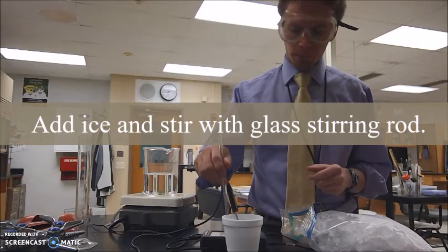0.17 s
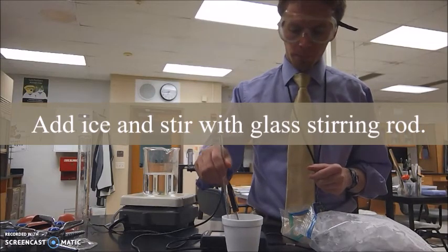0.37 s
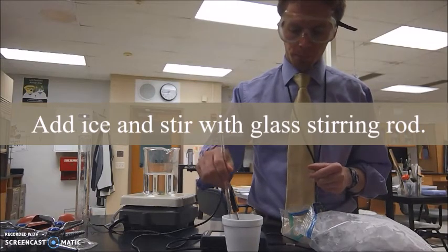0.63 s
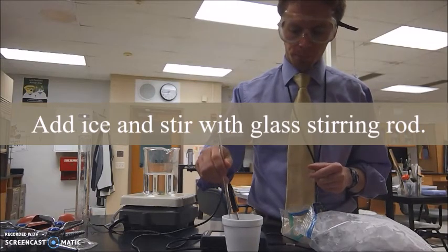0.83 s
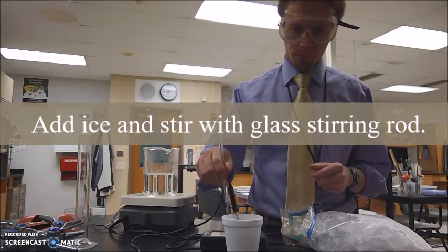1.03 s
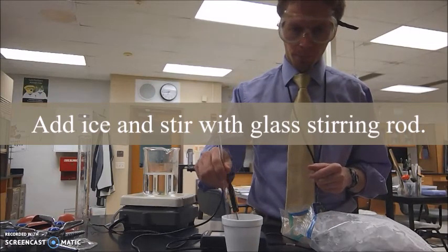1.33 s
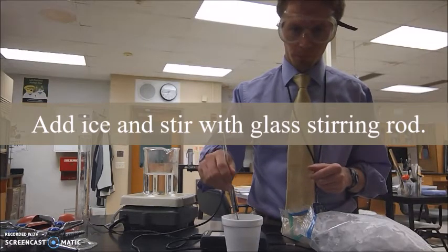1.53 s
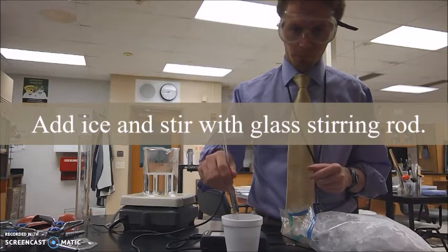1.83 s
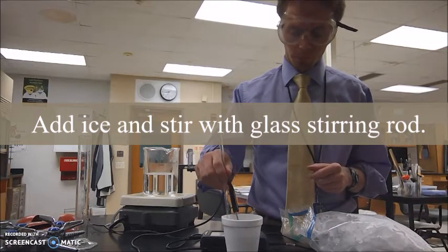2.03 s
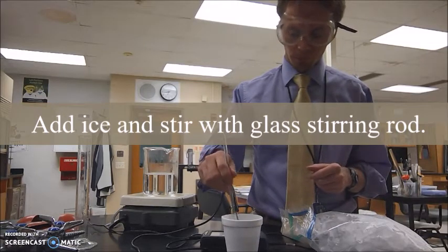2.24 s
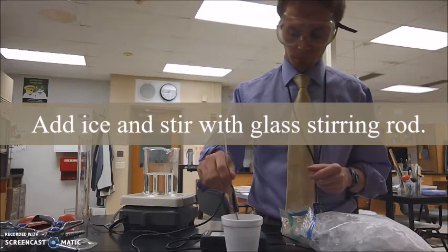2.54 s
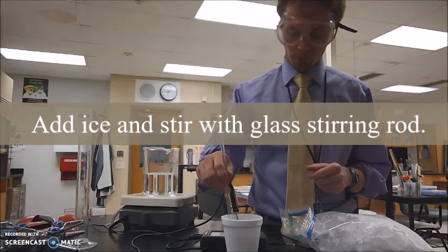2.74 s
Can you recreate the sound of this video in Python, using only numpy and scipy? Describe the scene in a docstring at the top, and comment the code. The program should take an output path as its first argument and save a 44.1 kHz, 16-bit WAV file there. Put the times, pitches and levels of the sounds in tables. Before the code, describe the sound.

Ice cubes clink and knock quickly against a glass stirring rod and foam cup in a lab

```python
"""From start to end, ventilation rumbles very low, the mains hums and a faint high tone stays on in a hard-walled lab.
From the first moment a glass rod stirs ice in a foam cup of water, a metre from a small microphone: modes of the
rod ring over grainy cracks, and cubes knock on the foam wall, which answers dull and hollow as modes over damped noise.
After each knock small cubes tick on and the room echoes; a suppressor ducks the quiet gaps.
At 0.52 s a cube slides along the rod, at 0.64 s comes the strongest clink; near the end two low hollow notes sound."""
import sys
import numpy as np
from scipy import signal
from scipy.io import wavfile
from scipy.ndimage import uniform_filter1d

SR = 44100
rng = np.random.default_rng(int(sys.argv[2]) if len(sys.argv) > 2 else 0)


def level_to_linear(level):
    """Convert decibel levels to linear amplitude factors, elementwise."""
    exponent = np.asarray(level, float) / 20
    return 10 ** exponent


def wav_record(signal):
    """Record a signal, one row per channel, as 16-bit PCM in the file named by sys.argv[1]."""
    frames = np.transpose(np.atleast_2d(signal))
    bounded = np.clip(frames, -1, 1)
    # unit amplitude maps onto the largest positive 16-bit level
    quanta = np.round(bounded * 32767).astype(np.int16)
    wavfile.write(sys.argv[1], SR, quanta)


N = 127890   # length in samples, 2.9 s

RISE_MS, KNOCK_RISE_MS = 0.1, 0.83   # how fast an icy click and a wall knock swell
LEAD_MS = 2.3   # a graze comes this far ahead of each blow
SCATTER_DB = 2.5   # chance differences in how strongly a blow excites each mode
ROD_SHIFT, CUP_SHIFT = 0.004, 0.02   # share by which grip, water and ice move the modes from blow to blow


def rms_one(x):
    """Scale to rms 1."""
    return x / np.sqrt(np.mean(x ** 2) + 1e-20)


def at_hz(points, hz):
    """Read a spectrum table on a log frequency axis."""
    table_hz, value = np.array(points).T
    return np.interp(np.log(hz), np.log(table_hz), value)


def bands(low_hz, high_hz, count, size):
    """Noises in neighbouring bands, each cut from one of two white noises, with their centres in Hz."""
    edges = np.geomspace(low_hz, high_hz, count + 1)
    settle = 8000   # samples dropped while the filters start up
    white = rng.standard_normal((2, size + settle))
    result = []
    for k, (low, high) in enumerate(zip(edges, edges[1:])):
        band = signal.butter(2, [low, high], "band", fs=SR, output="sos")
        result.append((np.sqrt(low * high), signal.sosfilt(band, white[k % 2])[settle:]))
    return result


def train(s, gains):
    """Impulses at the given times."""
    out = np.full(N, 1e-18, dtype=gains.dtype)
    np.add.at(out, (s * SR).astype(int), gains)
    return out


def dying(clicks, t60, rise_ms):
    """Envelope with a short rise and an exponential fall of 60 dB in t60 seconds."""
    fall = level_to_linear(-60 / (t60 * SR))
    rise = np.exp(-1000 / (rise_ms * SR))
    return signal.lfilter([1 - rise], np.convolve([1, -fall], [1, -rise]), clicks)


def ring(clicks, hz, t60, rise_ms):
    """Each click swells briefly into a dying sine; hz may change in time."""
    phase = 2 * np.pi * np.cumsum(hz * np.ones(N)) / SR
    return (dying(clicks, t60, rise_ms) * np.exp(1j * phase)).real


def shifting(s, share):
    """Pitch factor that takes a new value at every blow."""
    steps = 1 + share * rng.standard_normal(len(s) + 1)
    return steps[np.searchsorted(s - LEAD_MS / 1000, np.arange(N) / SR)]


def contacts(s, db, ms):
    """Each blow is a graze, four quick touches and eight rattling ones; complex sizes carry phase slips."""
    lead_db, rattle_per_s, rattle_db, rattle_t60_s = -22, 190, -18, 0.1   # cubes jostle on after a blow
    u = rng.random((len(s), 13))
    slip = rng.normal(0, 0.85, (len(s), 13))
    touch_s = np.sort(u[:, :5], axis=1) * ms / 1000
    touch_s -= touch_s[:, 1:2]
    touch_s[:, 0] = -LEAD_MS / 1000
    rattle_s = ms / 1000 + np.cumsum(-np.log(u[:, 5:] + 1e-6), axis=1) / rattle_per_s
    touch_size = np.tile([level_to_linear(lead_db), 0.33, 0.36, 0.33, 0.25], (len(s), 1))
    rattle_size = level_to_linear(rattle_db - 60 * rattle_s / rattle_t60_s + 5.0 * slip[:, 5:])
    sizes = np.hstack([touch_size, rattle_size])
    slip[:, 5:] *= 4   # the rattle slips further in phase
    when = np.minimum(s[:, None] + np.hstack([touch_s, rattle_s]), (N - 1) / SR)
    return when, level_to_linear(db)[:, None] * sizes * np.exp(1j * slip)


# The colour of the soft air noise. Each row: pitch in Hz, relative level per Hz in dB.
AIR_COLOUR = [(35, 4), (100, -4.5), (300, -10), (750, -19.5), (1300, -27), (2200, -31.5), (4000, -38),
              (10000, -42), (16000, -61)]
# The steady narrow tones. Each row: pitch in Hz, width in Hz, steadiness (no unit), level in dB.
STEADY_TONES = [(26.5, 5, 2.6, -44), (117.8, 14, 1, -55.5), (10650, 25, 0.7, -79)]


def background():
    """Soft air noise in coloured bands, and narrow tones that waver as filtered noise turns their phase and size."""
    air = sum(level_to_linear(at_hz(AIR_COLOUR, hz)) * noise for hz, noise in bands(30.4, 13000, count=20, size=N))
    out = level_to_linear(-51) * rms_one(air)
    t = np.arange(N + SR) / SR   # the first second lets the wavering settle and is dropped
    for hz, width, steady, level_db in STEADY_TONES:
        r = np.exp(-np.pi * width / SR)
        wander = signal.lfilter([1], [1, -2 * r, r * r], rng.standard_normal((2, N + SR)))
        wander = steady + (wander[0] + 1j * wander[1]) / wander.std()
        tone = (wander * np.exp(2j * np.pi * hz * t)).real[SR:]
        out = out + level_to_linear(level_db) * rms_one(tone)
    return out


# How long the lab echoes. Each row: pitch in Hz, time to fall by 60 dB in seconds.
ECHO_TIMES = [(300, 0.4), (1000, 0.36), (3000, 0.25), (8000, 0.21), (16000, 0.11)]


def lab(x):
    """Diffuse reflections from hard walls: noise that swells within 3.1 ms and dies band by band."""
    t = np.arange(SR * 3 // 4) / SR
    noises = bands(193, 22000, count=10, size=len(t))
    tail = sum(noise * level_to_linear(-60 * t / at_hz(ECHO_TIMES, hz)) for hz, noise in noises)
    tail = tail * np.clip(t / 0.0031, 0, 1) ** 2
    return signal.fftconvolve(x, tail / np.sqrt(np.sum(tail ** 2)))[:N]


# A cube slides along the rod. Each row: start in seconds, length in seconds, level in dB.
CUBE_SLIDES = [(0.52, 0.045, -37)]


def jostle():
    """Cubes tick against each other after every knock and while sliding: random grains of short icy pitch."""
    jostle_db, jostle_t60_s = -28.5, 0.24   # level is relative to the knock
    grains_per_s, grain_cycles = 1500, 60.0   # a grain falls by 60 dB in this many cycles
    s, db = np.transpose(CUP_KNOCKS)[:2]
    t = np.arange(N) / SR
    stir = dying(train(s, level_to_linear(db + jostle_db)), jostle_t60_s, rise_ms=4.0)
    for start, length, slide_db in CUBE_SLIDES:
        stir = stir + level_to_linear(slide_db) * np.sin(np.pi * np.clip((t - start) / length, 0, 1) ** 0.71)
    hits = rng.random(N) < grains_per_s / SR
    sizes = level_to_linear(2.65 * np.minimum(rng.exponential(1, N), 4))
    grains = hits * sizes * np.exp(2j * np.pi * rng.random(N))
    pitches = np.geomspace(1300, 13000, 24)
    dealt = rng.integers(0, len(pitches), N)   # which pitch each grain gets
    out = 0
    for k, hz in enumerate(pitches):
        clicks = stir * grains * (dealt == k) * (2300 / hz) ** 0.77 + 1e-18
        out = out + ring(clicks, hz, grain_cycles / hz, RISE_MS)
    return out


# Low hollow notes, perhaps air pockets between the cubes.
# Each row: start in seconds, pitch in Hz, level in dB, time to fall by 60 dB in seconds.
POCKET_NOTES = [(2.661, 455, -34, 0.07), (2.871, 465, -40, 0.1)]


def glugs():
    """Each low hollow note is one softly starting, dying sine."""
    return sum(ring(train(np.array([s]), level_to_linear(np.array([db]))), hz, t60, rise_ms=7.2)
               for s, hz, db, t60 in POCKET_NOTES)


def hollow(s, hollow_db, phase):
    """The air above the water sounds one hollow note, and the bench under the cup booms with it as low noise."""
    note = ring(train(s, level_to_linear(hollow_db) * np.exp(1j * phase)), 558.5 * shifting(s, ROD_SHIFT), 0.2, rise_ms=6.2)
    (_, low), = bands(150, 390, count=1, size=N)
    boom = rms_one(low) * dying(train(s, level_to_linear(-13.5 + hollow_db)), 0.24, rise_ms=7.1)
    return note + boom


def notes(s, hz, db):
    """The contact spot of each knock sounds one short pitch of its own."""
    t = np.arange(SR // 8) / SR
    envelope = level_to_linear(db[:, None] - 60 * t / 0.075) * (1 - np.exp(-1000 * t / KNOCK_RISE_MS))
    wave = envelope * np.sin(2 * np.pi * hz[:, None] * t)
    out = np.zeros(N + SR)
    np.add.at(out, (s * SR).astype(int)[:, None] + np.arange(len(t)), wave)
    return out[:N]


def nearness(hz, centre_hz):
    """Bell curve over pitch, one octave wide to each side: a knock mostly wakes what lies near its centre."""
    return np.exp(-0.5 * np.log2(hz / centre_hz) ** 2)


def thud(when, size, centre_hz):
    """Foam and water damp the knock into noise whose high bands die sooner."""
    out = 0
    for hz, noise in bands(498, 5310, count=10, size=N):
        gain = level_to_linear(-20.5) * nearness(hz, centre_hz)
        t60 = 0.1 * (1000 / hz) ** 0.32
        out = out + rms_one(noise) * dying(train(when, gain[:, None] * np.abs(size)), t60, KNOCK_RISE_MS)
    return signal.sosfilt(signal.butter(5, 430, "high", fs=SR, output="sos"), out)


# Ice meets the cup wall. Each row: start in seconds, level in dB, centre of the knock in Hz,
# level of its own short note in dB relative to the knock, level of the hollow note in dB.
CUP_KNOCKS = [(0.039, -29, 1193, -9, -55), (0.108, -21, 1612, -13, -47), (0.195, -41, 1150, -7, -68),
              (0.245, -23.5, 1240, -21, -44), (0.315, -18.5, 1420, -10, -60), (0.362, -27, 2470, -3.5, -45),
              (0.427, -24.5, 1290, 0, -63), (0.53, -33, 1870, 7, -43), (0.538, -24, 728, -10, -46),
              (0.6, -32, 1270, -13, -63), (0.642, -19.5, 1610, -15, -55), (0.689, -23, 1320, -9.5, -42.5),
              (0.744, -30.5, 946, -9.0, -44), (0.778, -17.5, 773.6, -5, -33), (0.818, -33, 1350, 1, -41.5),
              (0.881, -20, 2197, -2, -38), (0.906, -17, 1520, -24.5, -35), (0.958, -29, 1230, -29, -62),
              (1.021, -32, 2130, -3, -51), (1.044, -17.5, 1173, -11.5, -31.5),
              (1.086, -29.5, 1196, -3, -44.5), (1.174, -24.5, 1560, -6, -42.5),
              (1.227, -19, 1460, -4.5, -41.5), (1.241, -29.5, 1093, 0, -44), (1.287, -25, 1790, -16, -40),
              (1.299, -24, 1846, -14, -37), (1.313, -21.5, 939, -13, -41.5), (1.391, -18, 864, -18, -28),
              (1.506, -23.5, 1380, -7, -43.5), (1.536, -28.5, 1110, -5, -48.5),
              (1.57, -23.5, 1038, -9.5, -57.5), (1.63, -19, 1986, -8, -35),
              (1.731, -15.5, 1320, -11.5, -29.5), (1.771, -28, 770, -4, -50.5),
              (1.927, -44.5, 1852, 1.5, -54.5), (1.982, -16.5, 1794, -4.5, -43),
              (2.067, -26.5, 1900, -13.5, -61), (2.086, -17.5, 798.5, -7.5, -29),
              (2.127, -30.5, 1282, -2, -32.5), (2.33, -20.5, 1825, -0.5, -40.5),
              (2.387, -22, 1618, -14, -52), (2.412, -18.5, 920, -15, -29), (2.444, -23.5, 770, -4, -28.5),
              (2.617, -46.5, 1230, -2, -80), (2.688, -18.5, 1869, -4.5, -44),
              (2.706, -31, 1829, -16.5, -38.5), (2.766, -18.5, 952, -10, -28),
              (2.805, -26.5, 951, -22, -29)]
# The ways the water-filled foam cup rings.
# Each row: pitch in Hz, relative level in dB, time to fall by 60 dB in seconds.
CUP_MODES = [(770, -6.5, 0.17), (934, -5.5, 0.18), (1110, -5.5, 0.054), (1253, -5.5, 0.18),
             (1380, -7, 0.081), (1490, -2, 0.022), (1634, -6, 0.1), (1816, -0.5, 0.072),
             (2023, -3.5, 0.044), (2256, -4.5, 0.066), (2420, -11.5, 0.034), (3100, -2.5, 0.047)]


def cup():
    """Every knock rings the wall modes near its centre pitch, with a thud, a short note and the hollow."""
    s, db, centre_hz, note_db, hollow_db = np.transpose(CUP_KNOCKS)
    when, size = contacts(s, db, ms=2.2)
    chance = rng.normal(0, 1, (len(s), len(CUP_MODES) + 1, 2))
    out = thud(when, size, centre_hz)
    for k, (hz, mode_db, t60) in enumerate(CUP_MODES):
        gain = level_to_linear(-9.5 + mode_db + SCATTER_DB * chance[:, k, 0]) * nearness(hz, centre_hz)
        gain = gain * np.exp(4j * chance[:, k, 1])   # random starting phase
        out = out + ring(train(when, gain[:, None] * size), hz * shifting(s, CUP_SHIFT), t60, KNOCK_RISE_MS)
    out = out + hollow(s, hollow_db, 4 * chance[:, -1, 1])
    return out + notes(s, centre_hz, db + note_db) + glugs()


# The colour of cracking ice. Each row: pitch in Hz, relative level per Hz in dB.
CRACK_COLOUR = [(2500, -0.5), (8170, -3), (8910, -9.5), (11000, -2.5), (12400, -26), (14300, -15.5),
                (16500, -39)]


def crack(when, size, crack_db, tilt_db):
    """The ice cracks as short grainy noise, louder or softer towards the treble from clink to clink."""
    out = 0
    for hz, noise in bands(2650, 15790, count=8, size=N):
        gain = 3 * level_to_linear(-1 + crack_db + at_hz(CRACK_COLOUR, hz) + tilt_db * np.log2(min(hz, 11000) / 7000))
        out = out + noise * dying(train(when, gain[:, None] * np.abs(size)), 0.009, RISE_MS)
    return out


# The rod meets ice. Each row: start in seconds, level of the ring in dB, level of the crack in dB,
# tilt of the ring in dB per octave, tilt of the crack in dB per octave.
ROD_CLINKS = [(0.0394, -21.5, -49, -5.5, -6), (0.1078, -17, -28.5, 9.5, -9), (0.2467, -33, -43.5, -3, -15),
              (0.3137, -15, -22, 0.5, -10.5), (0.3636, -29, -49, -21, 20), (0.4241, -26, -36, 17.5, 2),
              (0.5302, -30.5, -27, 5, -6), (0.5583, -32, -48, -15, -1), (0.6421, -4.5, -12.5, 6.3, 8.5),
              (0.6911, -36, -36, 12, -14.5), (0.7762, -36, -30.5, -19, -5.5), (0.8804, -13, -18.5, 6, 1.5),
              (0.9056, -44.5, -32, 21, -13), (0.9567, -19, -37, 7.5, -10), (1.045, -53, -33.5, 2, -6),
              (1.174, -18, -34.5, -5, -11), (1.2269, -21.5, -33, 1, -8), (1.2427, -18, -23.5, -4, -1.5),
              (1.2867, -22.5, -32.5, -6, -4), (1.2994, -18, -23, -5.5, 3), (1.3937, -59, -38, -14.5, -13.5),
              (1.5067, -29.5, -38.5, 13, -14), (1.5373, -27, -47, -1.5, -17.5),
              (1.5722, -26, -39, -5.3, -3), (1.6291, -9.5, -14.5, 8.5, 13.3), (1.73, -14.5, -22, -6, -0.5),
              (1.98, -9.5, -18.5, 10, 10.5), (2.0011, -32, -22, -2, 3), (2.0687, -35, -28, -17.5, -1.5),
              (2.1248, -49, -48, -12.5, -10), (2.3286, -12.5, -15, 3.5, 1), (2.388, -28, -29.5, -15, -2.5),
              (2.4086, -25.5, -28.5, -8.5, -7.5), (2.686, -12.5, -18, -4.5, 4),
              (2.7062, -22.5, -26.5, -6, -3), (2.7622, -32.5, -28, -15.5, -5), (2.8047, -57, -53, -11, -17)]
# The ways the wet rod bends and rings.
# Each row: pitch in Hz, relative level in dB, time to fall by 60 dB in seconds.
ROD_MODES = [(4020, -2, 0.034), (5290, -20, .12), (5910, -8, 0.04), (8285, -5, 0.025), (10880, 0, 0.022),
             (13860, -13, .025)]


def rod():
    """Every clink rings the rod's bending modes and adds a crack of ice."""
    s, db, crack_db, tilt_db, crack_tilt_db = np.transpose(ROD_CLINKS)
    when, size = contacts(s, np.zeros(len(s)), ms=5.4)
    chance = rng.normal(0, 1, (len(s), len(ROD_MODES), 2))
    out = 0
    for k, (hz, mode_db, t60) in enumerate(ROD_MODES):
        tilt = tilt_db * np.log2(min(hz, 11000) / 7000)   # tilts turn about 7 kHz and stop at 11 kHz
        gain = level_to_linear(-10.5 + db + mode_db + tilt + SCATTER_DB * chance[:, k, 0])
        gain = gain * np.exp(4j * chance[:, k, 1])   # random starting phase
        out = out + ring(train(when, gain[:, None] * size), hz * shifting(s, ROD_SHIFT), t60, RISE_MS)
    return out + crack(when, size, crack_db, crack_tilt_db)


def scene():
    """Rod, cup and jostling cubes, their reflections, the room tone."""
    near = rod() + cup() + jostle()
    return (near + level_to_linear(-14.5) * lab(near) + background())[None, :]


def suppressor(dry):
    """Gain that turns everything down while the sound above 500 Hz is quiet."""
    open_db, span_db, fall_db_per_s, smooth_s = -43.5, 3, 104.5, 0.068
    upper = signal.sosfilt(signal.butter(2, 500, "high", fs=SR, output="sos"), dry[0])
    level_db = 10 * np.log10(uniform_filter1d(upper ** 2, size=512) + 1e-12)
    fall = fall_db_per_s * np.arange(N) / SR
    held_db = np.maximum.accumulate(level_db + fall) - fall   # jumps up at once, falls steadily
    shut = 1 / (1.5 + np.exp((held_db - open_db) / span_db))   # two thirds at most
    shut = uniform_filter1d(shut, size=int(smooth_s * SR))
    return level_to_linear(-13 * shut)


def top_cut(x):
    """Nothing passes above the cut-off."""
    return signal.sosfilt(signal.butter(12, 16810, fs=SR, output="sos"), x)


def record(dry):
    """The input rounds off peaks, the suppressor ducks the gaps and a steep filter cuts the top."""
    peak_top = 0.4   # height that rounded peaks approach
    rounded = peak_top * np.tanh(dry / peak_top)
    gated = suppressor(dry) * rounded
    mix = signal.sosfilt(signal.cheby2(10, 60, 16800, fs=SR, output="sos"), gated)
    return top_cut(mix)


dry = scene()
out = record(dry)
wav_record(out)
```